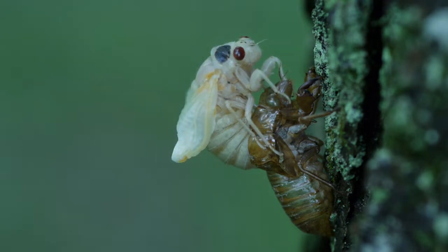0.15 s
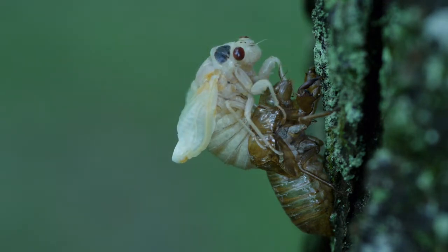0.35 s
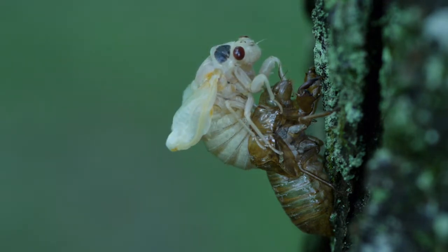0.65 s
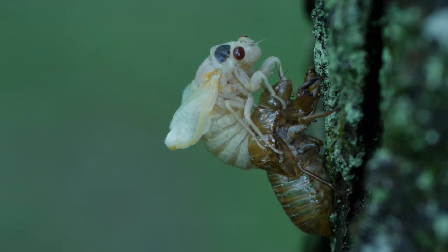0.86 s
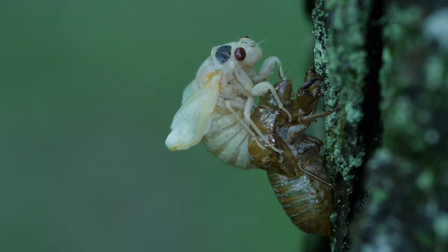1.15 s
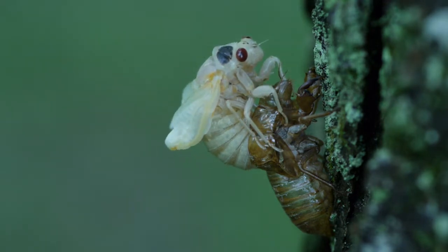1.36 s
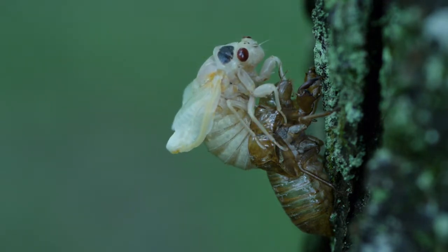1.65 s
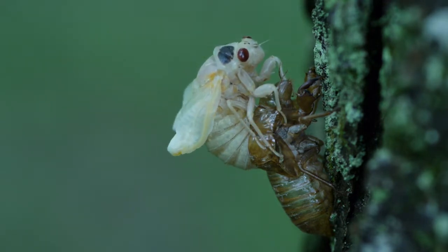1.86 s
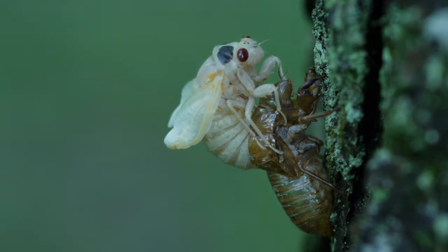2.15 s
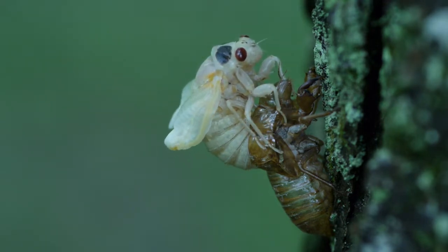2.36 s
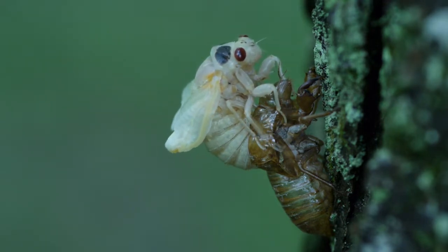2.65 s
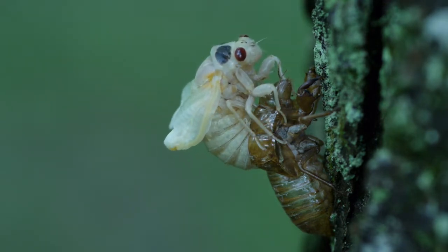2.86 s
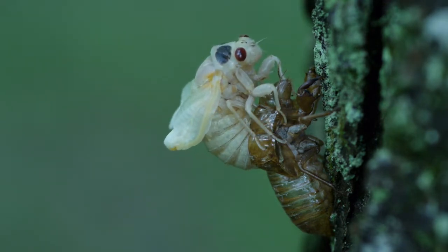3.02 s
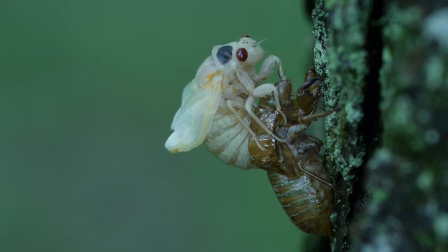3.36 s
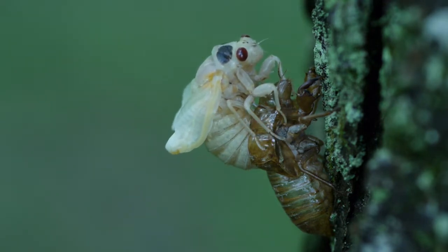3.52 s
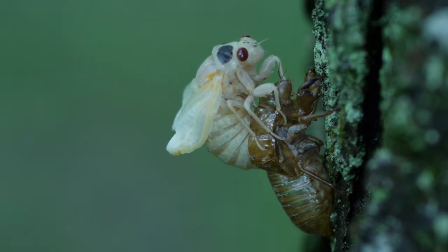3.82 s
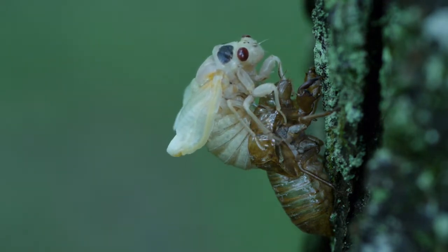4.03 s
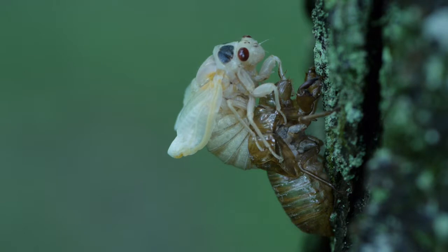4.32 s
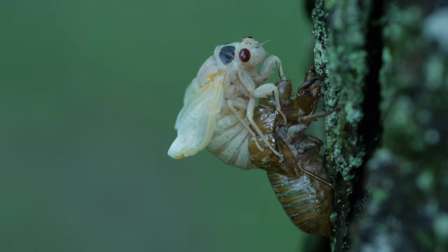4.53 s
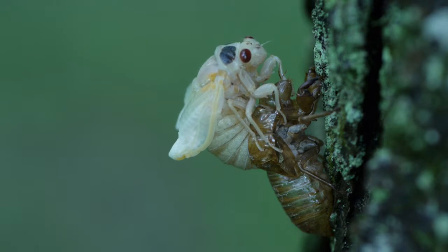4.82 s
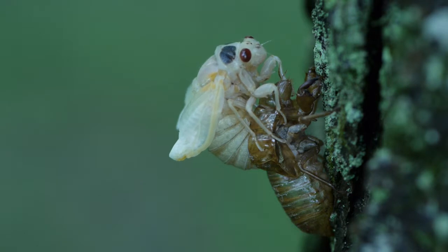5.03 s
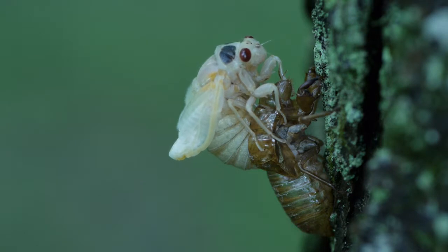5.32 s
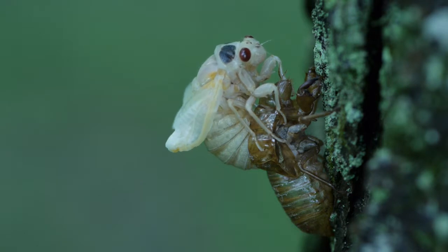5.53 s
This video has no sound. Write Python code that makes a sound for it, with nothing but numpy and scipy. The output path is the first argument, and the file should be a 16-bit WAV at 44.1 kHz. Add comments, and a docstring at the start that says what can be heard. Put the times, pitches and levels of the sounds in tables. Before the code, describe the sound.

From 0 to about 5.7 seconds a huge chorus of periodical cicadas fills a wood with an unbroken drone. Countless rapid clicks ring hollow bodies and fuse into a narrow, breathy, whistling hum near 1.3 kHz, with grainy fast beating and gentle swells of a decibel or two, one slightly stronger around 1.2 seconds. Nearer males hold almost the same note, then slur down and fade as phrases end, blurred by echoes among the trunks. Much softer tones near 850 to 950 Hz lie below, and faint rib ringing at 2 to 4 kHz above. A second insect kind adds a very faint, steady high hiss, over soft outdoor air. At about 0.5 seconds comes a tiny two-part whistle chip above 8 kHz; at 2.9 a small dry double tick, like a twig. A distant, wobbling low motor hum near 124 Hz grows toward the end, still very faint. The sound is mono and diffuse.

```python
"""A wood full of periodical cicadas, all through: rib clicks ring hollow abdomens and merge into one drone near
1.3 kHz. Nearer males, gliding tones smeared by the trees, hold that note and slur it down as each phrase ends.
A second kind buzzes above as coloured noise, over faint outdoor air, also made of noise.
Near 0.5 s comes a thin two-part chip, a short whistle; near 2.9 s a dry tick, two snaps ringing a twig.
A far motor, a wobbling low hum, slowly grows until the end."""
import sys
import numpy as np
from scipy import signal
from scipy.fft import rfft, irfft
from scipy.io import wavfile
from scipy.ndimage import uniform_filter1d

SR = 44100
rng = np.random.default_rng(int(sys.argv[2]) if len(sys.argv) > 2 else 0)


def generate_wav(sig):
    """Save sig (samples, or channels by samples) to the path in sys.argv[1] as 16-bit PCM at SR."""
    pcm = np.round(np.clip(np.atleast_2d(sig).T, -1, 1) * 32767).astype(np.int16)
    wavfile.write(sys.argv[1], SR, pcm)


N = 250488
TIME = np.arange(N) / SR  # seconds

# colour of the outdoor air, relative: (frequency [Hz], density [dB per Hz])
AIR_COLOUR = [(20, -22), (50, -20), (75, -22), (95, -12), (115, -7), (200, -1.5), (300, -1), (450, 0.5),
              (680, 4), (1000, -3.5), (2000, -9.5), (4000, -25)]
# the far motor grows louder: (time [s], peak level [dB])
MOTOR_LEVEL = [(0, -88), (2.2, -83), (3.2, -78.5), (4.8, -74.5), (5.68, -70)]
# the two snaps of the dry tick: (time [s], strength before ringing [dB])
TICK_SNAPS = [(2.9153, -8), (2.9167, -19)]
# what the twig rings with: (frequency [Hz], width [Hz], gain [dB])
TWIG_MODES = [(3830, 700, -2.5), (4800, 590, 2), (5700, 900, -6), (7850, 1000, -5)]
# the two parts of the thin chip: (middle time [s], length [s], frequency [Hz], peak level [dB])
CHIP_PARTS = [(0.468, .03, 8230, -53), (0.489, .022, 8450, -54)]
# colour of the far buzzing kind, relative: (frequency [Hz], density [dB per Hz])
BUZZ_COLOUR = [(2800, -10.5), (3600, -2), (4400, 0), (5200, -0.5), (6200, -3), (7300, -5), (8200, -1),
               (9000, -1), (10200, -4), (12000, -8.5), (13300, -11.5), (14500, -16), (15600, -24)]
# In the next three, the width is that of each of two passes through the resonance.
# upper ring of the tymbal ribs: (frequency [Hz], width [Hz], rms level [dB])
RIB_MODES = [(2250, 890, -58), (2660, 510, -58), (3933, 600, -61.5)]
# abdomens lowered at the end of a phrase: (frequency [Hz], width [Hz], rms level [dB])
SLURRED_MODES = [(853.5, 106, -49.5), (951, 168, -48.5)]
# abdomens of the far throng on the held note: (frequency [Hz], width [Hz], relative rms level [dB])
HELD_MODES = [(1340, 139, 2), (1214.6, 180, -4.5), (1526, 173, -20.5)]
# the drone's level wavers slightly: (time [s], rms level [dB])
DRONE_LEVEL = [(0.0, -26.7), (0.59, -26.5), (0.98, -27.5), (1.18, -24.5), (1.37, -26.5), (1.76, -26.1),
               (1.96, -26), (2.35, -27), (2.55, -26), (3.13, -27.1), (3.53, -25.5), (3.72, -26), (4.5, -26),
               (4.7, -27), (4.9, -26), (5.48, -26.4), (5.68, -25)]

STEADY_S = 0.188  # s; the drone's loudness is evened out over this span, quicker beats stay free
NEAR_DB = -4.5  # dB; weight of the nearer males as they join the far throng
CUTOFF_HZ = 15700  # Hz; top edge of the whole sound


def from_db(db):
    """Turn decibels into a gain."""
    return 10 ** (np.asarray(db) / 20)


def rms_one(x):
    """Scale a sound to an rms (average strength) of 1."""
    return x / np.sqrt(np.mean(x ** 2) + 1e-20)


def level_curve(rows):
    """Turn rows of (time [s], level [dB]) into a gain for every sample."""
    return from_db(np.interp(TIME, *np.transpose(rows)))


def drift(rate):
    """Wander between random points, `rate` of them a second, with spread 1 at the points."""
    knots = rng.standard_normal(4096)
    return np.interp(TIME * rate, np.arange(len(knots)), knots)


def resonate(x, hz, width_hz):
    """Ring like one hollow body: a two-pole resonance with gain 1 at its peak."""
    r = np.exp(-np.pi * width_hz / SR)
    feed = np.array([1, 0, -1]) * (1 - r * r) / 2
    feedback = [1, -2 * r * np.cos(2 * np.pi * hz / SR), r * r]
    return signal.lfilter(feed, feedback, x + 1e-18)


def hiss(spectrum):
    """Shape random noise to a given colour, with rms 1."""
    hz, db = np.transpose(spectrum)
    bins = np.maximum(np.fft.rfftfreq(N, 1 / SR), 1)
    gain = from_db(np.interp(np.log(bins), np.log(hz), db, left=-80, right=-80))
    noise = rng.standard_normal(N)
    return rms_one(irfft(rfft(noise) * gain, N))


def air():
    """Faint outdoor air: soft noise, mostly low."""
    return from_db(-55) * hiss(AIR_COLOUR)


def motor(hum_hz):
    """A far motor: one low tone whose pitch wobbles at random."""
    pitch = hum_hz * (1 + 0.0187 * drift(8))
    return level_curve(MOTOR_LEVEL) * np.sin(2 * np.pi * np.cumsum(pitch) / SR)


def tick():
    """A dry double tick: each snap rings the twig's heavily damped modes."""
    snaps = np.zeros(N)
    for s, db in TICK_SNAPS:
        snaps[round(s * SR)] = from_db(db)
    ringing = 0
    for k, (hz, width_hz, db) in enumerate(TWIG_MODES):
        sign = (-1) ** k  # every other mode is flipped
        ringing = ringing + sign * from_db(db) * resonate(snaps, hz, width_hz)
    return ringing


def chips(roughness_hz):
    """A thin chip: a short whistle in two parts, made slightly rough by a quickly wandering pitch."""
    out = 0
    for s, length, hz, db in CHIP_PARTS:
        shape = np.cos(np.pi * np.clip((TIME - s) / length, -.5, .5))  # one smooth hump
        pitch = hz + roughness_hz * drift(400)
        out = out + from_db(db) * shape * np.sin(2 * np.pi * np.cumsum(pitch) / SR)
    return out


def buzzing_kind():
    """A second kind far off in the canopy, heard as a steady high hiss."""
    return from_db(-53.0) * hiss(BUZZ_COLOUR)


def throng(modes, clicks_per_s):
    """Rib clicks of countless insects, each ringing through tymbal and abdomen tuned alike."""
    out, run_in = 0, SR // 10  # the run-in lets the ringing build up before the start
    for hz, width_hz, db in modes:
        happens = rng.random(N + run_in) < clicks_per_s / SR
        clicks = happens * rng.standard_normal(N + run_in)
        tymbal = resonate(clicks, hz, width_hz)
        abdomen = resonate(tymbal, hz, width_hz)
        out = out + from_db(db) * rms_one(abdomen[run_in:])
    return out


def woods(x, t60):
    """Trunks and leaves scatter a sound into dense echoes that die by 60 dB in t60 seconds."""
    echoes = rng.standard_normal(N) * from_db(-60 * TIME / t60)
    # the last echoes wrap round to the start, so both ends are faded first
    soft_ends = signal.get_window(("tukey", .01), N)
    return rms_one(irfft(rfft(x * soft_ends) * rfft(echoes), N))


def caller(note_hz, phrase_s, slur_share, slur_drop, pulse_hz, pulse_depth, waver):
    """One male: a held, pulsing note that falls and fades as he lowers his abdomen."""
    own_phrase_s = phrase_s * rng.uniform(.8, 1.2)
    place = (TIME / own_phrase_s + rng.random()) % 1  # 0 to 1 through each phrase
    slur = np.clip((place - 1) / slur_share + 1, 0, 1)
    pitch = note_hz * (1 - slur_drop * slur) * (1 + waver * drift(12))
    effort = np.minimum(place * 10, 1) * (1 - slur) ** 2
    own_pulse_hz = pulse_hz * rng.uniform(0.72, 1.2)
    tymbal = 1 + pulse_depth * np.cos(2 * np.pi * own_pulse_hz * TIME)
    return effort * tymbal * np.sin(2 * np.pi * np.cumsum(pitch) / SR)


def near_callers(centre_hz, spread_hz, count):
    """Nearer males, each on a note of his own, heard through the trees."""
    notes = centre_hz + spread_hz * np.linspace(-1, 1, count)
    # phrase length and pulse rate are typical values; each male varies them
    voices = sum(caller(hz, phrase_s=2.6, slur_share=.25, slur_drop=.36,
                        pulse_hz=130.8, pulse_depth=0.26, waver=0.00806) for hz in notes)
    return woods(voices, t60=0.71)


def drone():
    """Far throng and nearer males on the held note, beating against each other, their level wavering slightly."""
    far = throng(HELD_MODES, clicks_per_s=12000)
    near = near_callers(centre_hz=1330, spread_hz=44, count=16)
    voices = far + from_db(NEAR_DB) * near
    loudness = np.sqrt(uniform_filter1d(voices ** 2, size=int(STEADY_S * SR)))
    return level_curve(DRONE_LEVEL) * voices / loudness


def scene():
    """The chorus all round, over the quiet of the wood, as one channel."""
    background = air() + motor(hum_hz=124.0)
    small_sounds = tick() + chips(roughness_hz=130)
    slurred = throng(SLURRED_MODES, clicks_per_s=8000)
    ribs = throng(RIB_MODES, clicks_per_s=20000)
    chorus = drone() + slurred + ribs
    return (background + small_sounds + buzzing_kind() + chorus)[None]


def record(dry):
    """Cut the treble steeply above the top edge with an elliptic low-pass filter."""
    steep_cut = signal.ellip(10, .1, 80, CUTOFF_HZ, fs=SR, output="sos")
    return signal.sosfilt(steep_cut, dry)


dry = scene()
out = record(dry)
generate_wav(out)
```